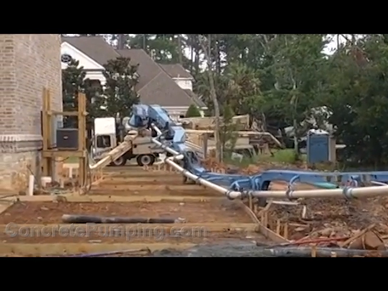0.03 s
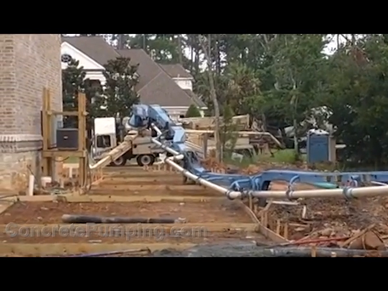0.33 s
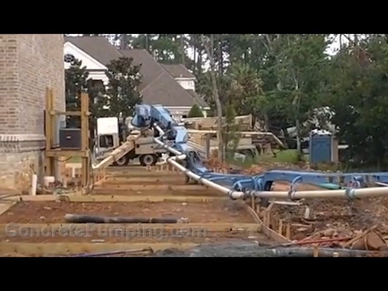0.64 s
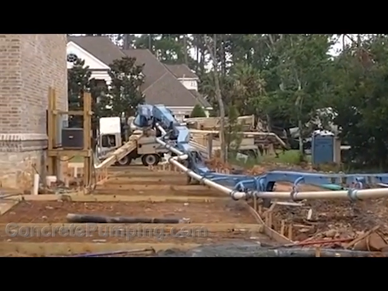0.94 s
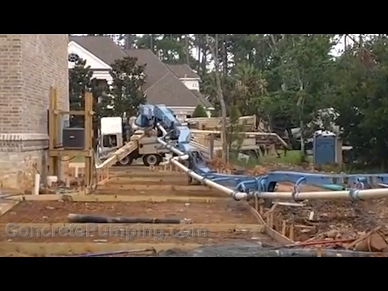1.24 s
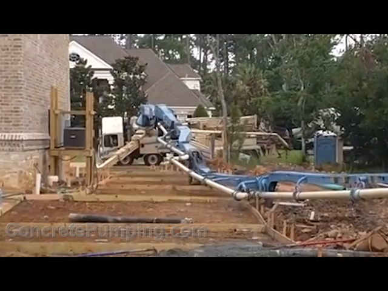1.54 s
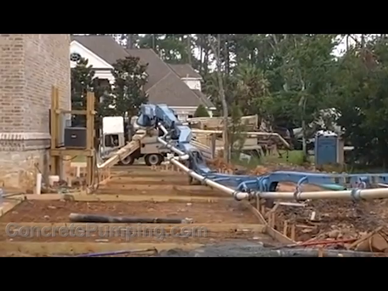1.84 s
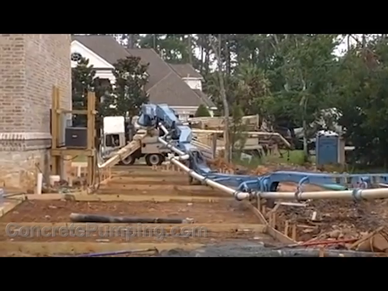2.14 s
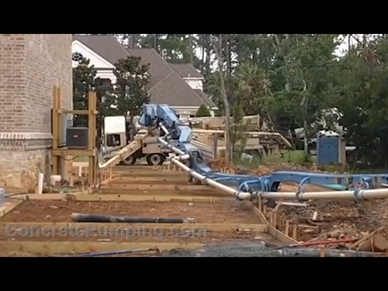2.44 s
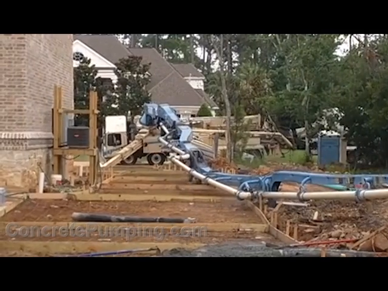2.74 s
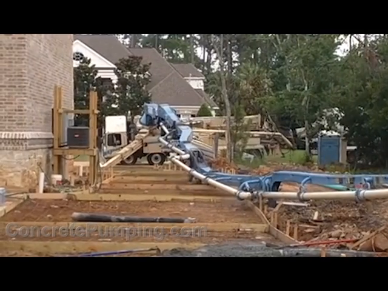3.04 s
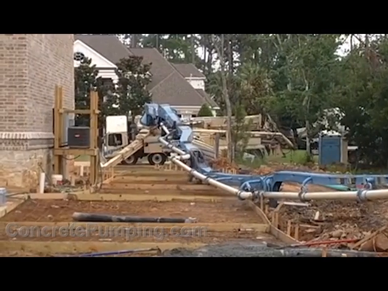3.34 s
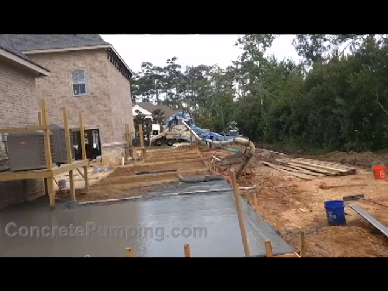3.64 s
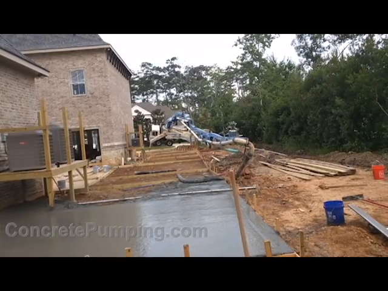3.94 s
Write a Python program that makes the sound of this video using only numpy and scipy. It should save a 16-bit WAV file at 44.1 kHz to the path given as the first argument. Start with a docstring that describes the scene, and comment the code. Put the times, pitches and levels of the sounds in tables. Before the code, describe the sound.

A diesel engine drones on a building site, muffled, with a deep boom, hum and clatter, while wind softly thumps the microphone. Around 0.7 seconds a concrete pump growls under load, followed by a few faint metal knocks. The engine pulls again at 1.5 seconds and slowly sags from 2.3. At about 3.7 seconds the sound abruptly opens into brighter machine clatter with hydraulic whines and hiss.

```python
"""Diesel machines drone on a building site, muffled, while moving air thumps the microphone.
First an engine booms as its cylinders fire, over a pump truck's hum and clattering engine casings.
Near 0.7 s the concrete pump growls under load, then metal parts knock. The engine, having eased,
pulls again at 1.5 s and slowly sags from 2.3 s. At 3.65 s the listening position suddenly changes,
revealing a brighter clatter, hydraulic whines and hiss."""
import sys
import numpy as np
from scipy import signal
from scipy.fft import rfft, irfft
from scipy.io import wavfile

SR = 44100
rng = np.random.default_rng(int(sys.argv[2]) if len(sys.argv) > 2 else 0)


def materialize(psi):
    """Save the field psi as 16-bit PCM at rate SR to the path in sys.argv[1].

    A 1-D psi becomes a single channel; in a 2-D psi each row is a channel.
    """
    bounded = np.clip(np.atleast_2d(psi).T, -1, 1)
    quanta = np.round(bounded * 32767).astype(np.int16)
    wavfile.write(sys.argv[1], SR, quanta)


N = 176400
T = np.arange(N) / SR

# How fast the engine's shaft turns: time_s, turns_per_s
ENGINE_SPEED = [(0, 23.7), (.2, 22.2), (.36, 21.1), (.6, 22.9), (.95, 24.7), (1.4, 24.9), (1.6, 24.3),
                (1.85, 25.05), (2.05, 25.4), (2.3, 25.1), (2.5, 24.1), (2.72, 23.65), (3, 21.9), (3.3, 20),
                (3.5, 19), (3.62, 19.1)]
# The exhaust's deep boom and its higher drone: time_s, level_db
BOOM_LEVEL = [(0, -27), (.2, -27), (.3, -34), (.38, -46), (1.42, -47), (1.53, -31.5), (1.7, -29.5),
              (2.2, -32), (2.48, -34.5), (2.78, -31), (2.95, -38.5), (3.3, -41), (3.62, -29.5)]
DRONE_LEVEL = [(0, -48.5), (.8, -48), (1.2, -42.5), (1.75, -42.5), (2.05, -37.5), (2.4, -43), (2.62, -38.5),
               (3.15, -41), (3.4, -51.5), (3.62, -52)]
# Other exhaust tones, and the shudder of a slowed engine: times_shaft_speed, relative_db
EXHAUST_TONES = [(1, -38), (3, -51.5), (4, -52), (5, -52), (6, -42), (8, -53.5), (9, -56), (11, -52),
                 (14, -56.5)]
SHUDDER_TONES = [(3, -38), (4, -41.5)]
# The truck's hum: pitch_hz, relative_db
HUM_TONES = [(117, -38), (175, -40), (210, -52), (230, -50)]
# How those exhaust tones and the hum swell and fade: time_s, gain_db
EXHAUST_GAIN = [(0, -8.5), (.8, -12), (1.1, -6), (1.7, -1), (2.1, -2.5), (2.8, -4.5), (3.2, -2),
                (3.62, -17.5)]
HUM_GAIN = [(0, 2), (.4, -3.5), (.8, -1), (1.05, -17.5), (1.5, -16.5), (3.62, -33)]

# Each noise's mix of low and high sound: pitch_hz, relative_db
RUMBLE_SHAPE = [(20, -8), (35, -5.5), (60, -2), (90, -2.5), (125, 1.5), (150, 1), (185, -0.5), (215, -14),
                (260, -24), (450, -49.5)]  # deep exhaust rumble
ROAR_SHAPE = [(120, -24.5), (190, 1.5), (225, 1), (255, -4.5), (285, -3.5), (350, -7), (420, -12),
              (520, -13.5), (800, -42)]  # exhaust pipe
GROWL_SHAPE = [(400, -35), (560, -8), (605, 2), (660, 0), (720, -6), (850, -12), (1050, -34.5)]  # pump under load
SURGE_SHAPE = [(170, -24.5), (215, -1.5), (240, -1), (270, -5), (315, -3.5), (380, -25.5)]  # low body of the pump's surge
CLATTER_SHAPE = [(250, -37), (420, -14), (553, -2.5), (590, -1), (683, 0.5), (795, -3.5), (1030, -8.5),
                 (1120, -5), (1170, -2.5), (1280, -6), (1390, -14), (1620, -10.5), (1700, -12), (2210, -50),
                 (3740, -120)]  # engine casings
OPEN_SHAPE = [(15, -40), (25, -7), (48, 1), (75, -2.5), (122, -11), (173, -8.5), (209, -4), (253, -13.5),
              (289, -11.5), (399, -24.5), (537, -21.5), (666, -15), (826, -23), (895, -24), (1110, -19),
              (1450, -18.5), (1750, -21.5), (2050, -23.5), (2420, -31), (2850, -32), (3600, -37),
              (4300, -42), (5000, -41), (6210, -34), (8580, -43.5), (10300, -43), (10750, -40),
              (11600, -42), (13200, -51), (15500, -46)]  # machines heard unmuffled
AIR_SHAPE = [(1, -16), (4, -3), (8, -1), (13, -8), (25, -19), (45, -35), (120, -60.5)]  # steady air on the microphone
GUST_SHAPE = [(8, -8.5), (16, 2), (30, 0), (45, -7), (90, -17), (200, -45.5)]  # brief gusts
# How loud the changing noises are: time_s, level_db
RUMBLE_LEVEL = [(0, -32.5), (.5, -38.5), (.7, -34), (.88, -33.5), (1.2, -35.5), (1.45, -39), (1.75, -36.5),
                (2.2, -39.5), (2.55, -40.5), (2.92, -34.5), (3.25, -39.5), (3.62, -38.5)]
ROAR_LEVEL = [(0, -44.5), (.2, -39.5), (.3, -42.5), (.59, -44.5), (.66, -43), (.82, -42.5), (1.02, -46.5),
              (1.45, -47.5), (1.6, -44.5), (1.8, -47), (2.2, -47.5), (2.5, -45.5), (3, -48), (3.6, -51)]
GROWL_LEVEL = [(0, -44), (.18, -44), (.32, -45), (.45, -52), (.6, -44.5), (.68, -38), (.76, -46),
               (.95, -51.5), (1.4, -51), (1.6, -63.5)]
SURGE_LEVEL = [(.57, -75), (.64, -38.5), (.81, -40.5), (1, -59.5)]
CLATTER_LEVEL = [(0, -42), (.15, -37.5), (.33, -42), (.55, -43), (.68, -44.5), (.85, -45.5), (1.05, -45),
                 (1.5, -48), (1.8, -47.5), (1.97, -44), (2.2, -45.5), (2.38, -43.5), (2.75, -47.5),
                 (3.05, -44.5), (3.3, -45), (3.62, -47.5)]

# The pump's faint ring, and the unmuffled hydraulic whines: pitch_hz, level_db, wander_hz
PUMP_RING = (1143, -60, 12)
OPEN_WHINES = [(538, -53, 3.5), (1143, -51, 4.6), (1756, -46, 4.8), (2580, -68, 26), (5900, -64, 54),
               (10940, -64.5, 47)]
# Unmuffled engine tones: pitch_hz, level_db
OPEN_ENGINE_TONES = [(31.7, -41.5), (78.4, -36.5), (117, -43.5), (156, -45.5), (204, -43.5), (279, -52)]
# Knocks of metal parts: start_s, relative_db, pitch_hz
METAL_KNOCKS = [(1.064, -31.5, 659), (1.109, -35.5, 581), (1.678, -37.5, 660)]
# The tones in each knock: times_pitch, gain_db, fade_s (time to fall by 60 dB)
KNOCK_TONES = [(1, -6.5, 0.055), (1.269, -7, .025), (1.951, -8, 0.029)]
# Gusts on the microphone: peak_s, width_s, level_db
AIR_GUSTS = [(.46, 0.026, -35), (.875, 0.026, -27), (.94, .03, -31), (1.128, 0.025, -28),
             (1.231, 0.013, -27.5), (1.412, 0.019, -25.5), (2.055, 0.027, -27.5), (2.64, 0.035, -29.5),
             (2.955, 0.032, -25.5)]


def engine_exhaust(speed, turns):
    """Two firings a turn make the boom; other tones follow the shaft, and shudder when it slows."""
    boom = tone(2 * turns, curve(BOOM_LEVEL), flutter=0.023, rate_hz=3.4)
    drone = tone(7 * turns, curve(DRONE_LEVEL), flutter=0.24, rate_hz=16)
    others = sum(tone(k * turns, db, flutter=0.14, rate_hz=4.6) for k, db in EXHAUST_TONES)
    strain = np.clip((20.72 - speed) / 3.1, 0, 1)  # grows below 20.72 turns a second
    shudder = sum(tone(k * turns, db, flutter=0.23, rate_hz=4.8) for k, db in SHUDDER_TONES)
    return boom + drone + others * amp(curve(EXHAUST_GAIN)) + strain * shudder


def pump_truck():
    """The truck hums while its exhaust rumbles in lumps and roars with the load."""
    hum = sum(tone(hz * T, db, flutter=0.42, rate_hz=9) for hz, db in HUM_TONES)
    rumble = noise(RUMBLE_SHAPE) * amp(curve(RUMBLE_LEVEL) + 1.6 * drift(rate_hz=14))
    roar = noise(ROAR_SHAPE) * amp(curve(ROAR_LEVEL))
    return hum * amp(curve(HUM_GAIN)) + rumble + roar


def concrete_pump():
    """The pump growls and surges as it takes load, over a faint whine."""
    growl = noise(GROWL_SHAPE) * amp(curve(GROWL_LEVEL))
    surge = noise(SURGE_SHAPE) * amp(curve(SURGE_LEVEL))
    return growl + surge + whine(*PUMP_RING)


def casing_clatter(turns):
    """Firings rattle the engine casings: noise that throbs and partly repeats each turn."""
    points_per_turn, memory_turns, repeat_share = 2048, 3.8, 0.4
    fresh = rng.standard_normal((int(turns[-1]) + 12, points_per_turn))
    # Each row is one turn and keeps a fading copy of the turns before it.
    pattern = signal.lfilter([1], [1, -np.exp(-1 / memory_turns)], fresh, axis=0)[10:].ravel()
    repeating = unit(np.interp(turns * points_per_turn, np.arange(len(pattern)), pattern))
    rattle = np.sqrt(repeat_share) * repeating + np.sqrt(1 - repeat_share) * rng.standard_normal(N)
    throb = 1 + 0.1 * np.cos(2 * np.pi * 2 * turns)
    return colour(rattle * throb, CLATTER_SHAPE) * amp(curve(CLATTER_LEVEL))


def metal_knocks():
    """Metal parts knock and ring with a few tones that die away fast."""
    knocks = np.zeros(N)
    for start_s, db, hz in METAL_KNOCKS:
        age_s = np.maximum(T - start_s, 0)
        for ratio, gain_db, fade_s in KNOCK_TONES:
            knocks += amp(db + gain_db - 60 * age_s / fade_s) * np.sin(2 * np.pi * hz * ratio * age_s)
    return knocks


def open_site():
    """The machines unmuffled: clatter and hiss throb with the firings, among tones and whines."""
    firing_hz = 38.87
    throb = 1 + 0.091 * np.cos(2 * np.pi * firing_hz * T)
    clatter = colour(rng.standard_normal(N) * throb, OPEN_SHAPE) * amp(-32.5)
    tones = sum(tone(hz * T, db, flutter=0.26, rate_hz=8.2) for hz, db in OPEN_ENGINE_TONES)
    whines = sum(whine(*row) for row in OPEN_WHINES)
    return clatter + tones + whines


def whine(hz, db, wander_hz):
    """A hydraulic whine, fuzzy because its pitch wanders quickly."""
    pitch_hz = hz + wander_hz * drift(rate_hz=63.9)
    return tone(np.cumsum(pitch_hz) / SR, db, flutter=0.29, rate_hz=49)


def wind():
    """Moving air presses on the microphone, with brief gusts that thump."""
    gusts = sum(amp(db) * np.exp(-((T - peak_s) / width_s) ** 2) for peak_s, width_s, db in AIR_GUSTS)
    return noise(AIR_SHAPE) * amp(-30.5) + noise(GUST_SHAPE) * gusts


def tone(cycles, db, flutter, rate_hz):
    """A tone that wavers in strength and timing; flutter sets how much."""
    strength = np.sqrt(2) * amp(db) * (1 + flutter * drift(rate_hz))
    return strength * np.sin(2 * np.pi * cycles + flutter * drift(rate_hz))


def noise(shape):
    """Fresh noise with the given mix of low and high sound."""
    return colour(rng.standard_normal(N), shape)


def colour(x, shape):
    """Shapes the lows and highs of x by (pitch_hz, relative_db) points, at strength 1."""
    hz, db = np.transpose(shape)
    bins_hz = np.fft.rfftfreq(N, 1 / SR)
    gain_db = np.interp(np.log(bins_hz + 1), np.log(hz + 1), db)
    return unit(irfft(rfft(x) * amp(gain_db), N))


def drift(rate_hz):
    """A random wobble of strength 1, with up to about rate_hz changes a second."""
    bins_hz = np.fft.rfftfreq(N, 1 / SR)
    keep_slow = np.exp(-(bins_hz / rate_hz) ** 2) * (bins_hz > 0)
    return unit(irfft(rfft(rng.standard_normal(N)) * keep_slow, N))


def low_pass(x, hz):
    """Sharply cuts the sound above hz."""
    return signal.fftconvolve(x, signal.firwin(4095, hz, window=("kaiser", 9), fs=SR), "same")


def curve(points):
    """Joins (time_s, value) points by straight lines."""
    return np.interp(T, *np.transpose(points))


def amp(db):
    """Turns decibels into a multiplier."""
    return 10 ** (np.asarray(db) / 20)


def unit(x):
    """Scales x to an average strength (rms) of 1."""
    return x / np.sqrt(np.mean(x ** 2) + 1e-20)


def scene():
    """The muffled position, then suddenly the open one."""
    change_s, fade_s = 3.648, 0.012
    speed = curve(ENGINE_SPEED)
    turns = np.cumsum(speed) / SR
    machines = engine_exhaust(speed, turns) + pump_truck() + concrete_pump() + casing_clatter(turns)
    muffled = low_pass(machines + metal_knocks() + wind(), hz=1695)
    open_share = np.clip((T - change_s) / fade_s, 0, 1)
    return (muffled * (1 - open_share) + open_site() * open_share)[None]


def record(dry):
    """Cuts off the very highest hiss."""
    return low_pass(dry[0], hz=15770)[None]


dry = scene()
out = record(dry)
materialize(out)
```